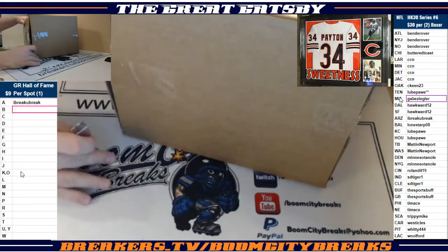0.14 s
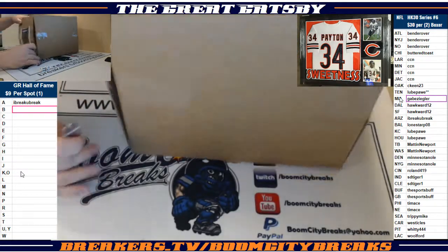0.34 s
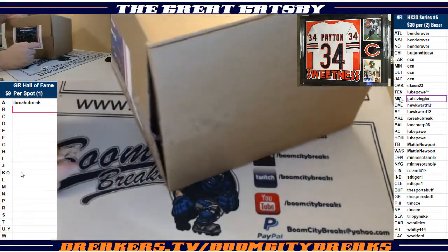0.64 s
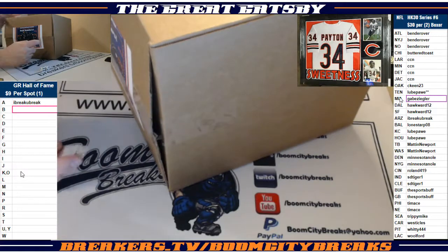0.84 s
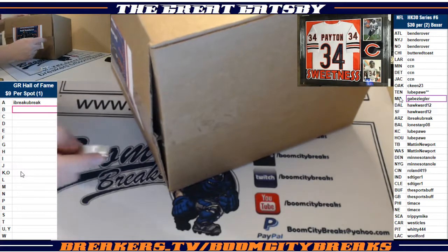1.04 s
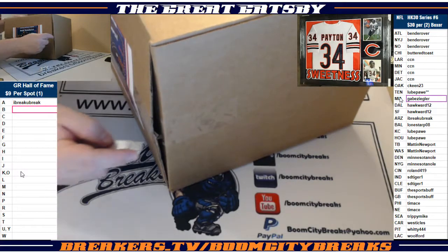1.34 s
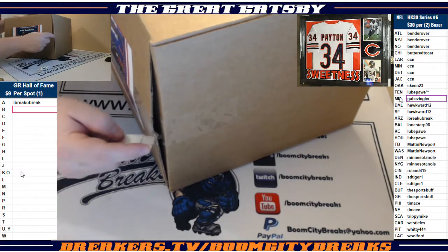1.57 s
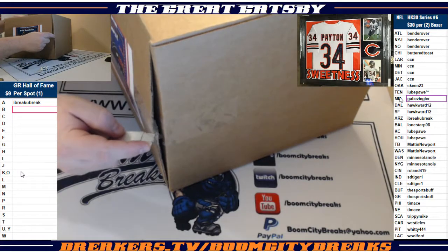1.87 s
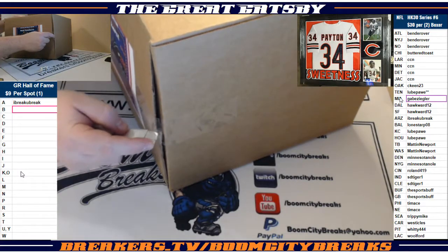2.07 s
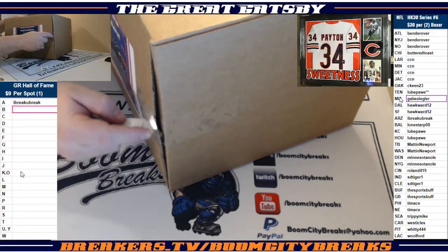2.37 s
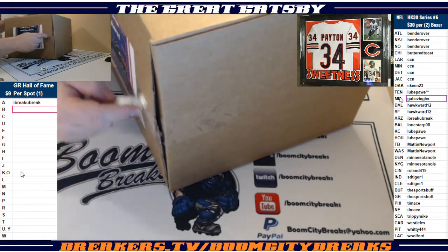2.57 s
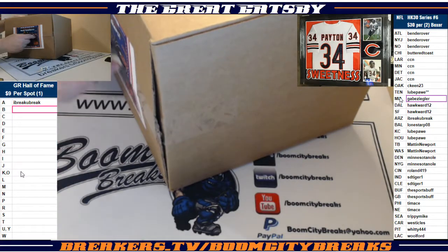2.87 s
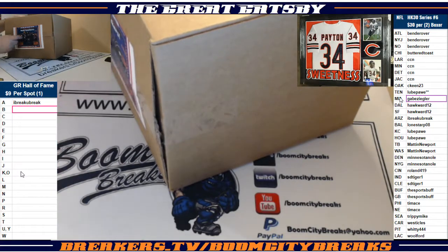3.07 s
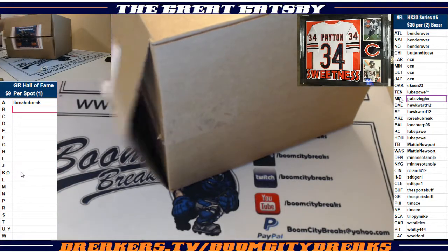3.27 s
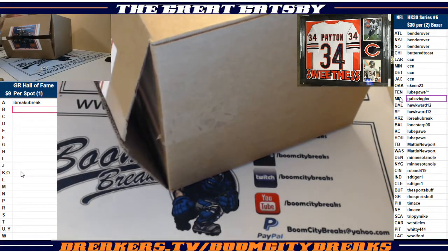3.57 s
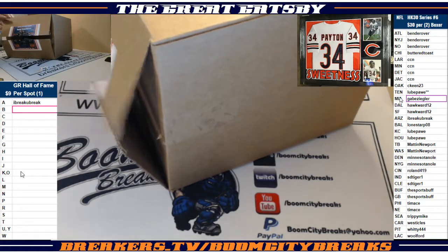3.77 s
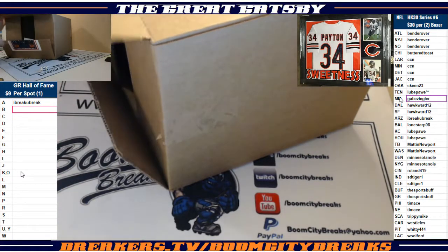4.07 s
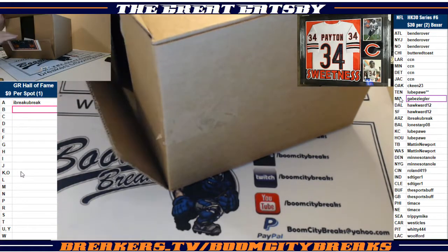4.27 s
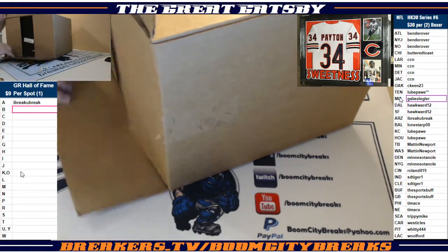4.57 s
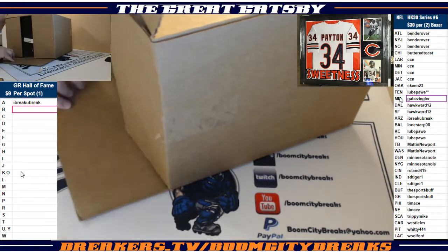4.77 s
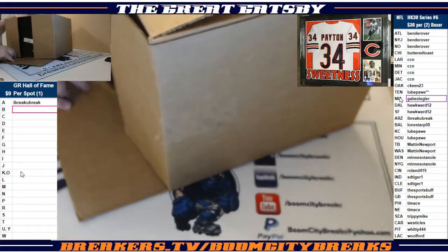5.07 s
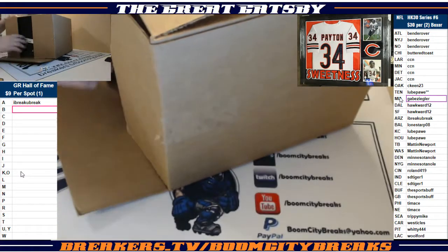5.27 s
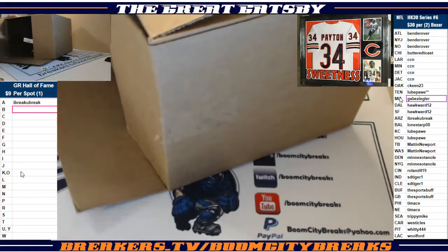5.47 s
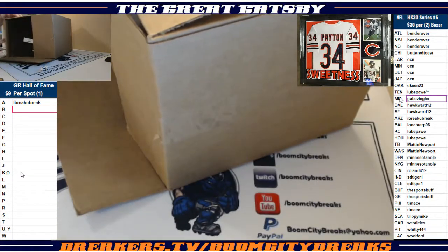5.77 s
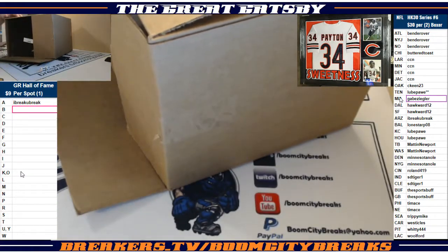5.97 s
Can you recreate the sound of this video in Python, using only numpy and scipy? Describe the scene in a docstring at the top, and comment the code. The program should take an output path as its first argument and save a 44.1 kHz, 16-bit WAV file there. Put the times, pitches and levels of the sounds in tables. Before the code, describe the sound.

In a small room, close to the microphone, a cardboard box knocks and slides round on a mat with rising hiss. After faint touches, a blade pops through tape and saws gritty along the seam, the tape ringing. Loud cracks snap the last tape, then flaps rub softly, one drags harshly, springs free with a hollow thump and glides to a stop. Faint fan noise and hum lie beneath.

```python
"""A cardboard box is handled on a desk mat in a small room, close to the microphone, over faint fan noise and hum.
It is knocked and swung round on the mat: friction noise whose hiss grows. After light touches a blade pops
through the tape and saws along the seam: gritty noise with a ringing tape. The last tape snaps in noise bursts.
Then the flaps are rubbed; one drags past the other, springs free and glides on, and a last soft touch follows.
Throughout, pushes ring the resonances of the hollow box, so that it drums."""
import sys
import numpy as np
from scipy import signal
from scipy.fft import rfft, irfft
from scipy.io import wavfile
from scipy.ndimage import uniform_filter1d

SR = 44100
rng = np.random.default_rng(int(sys.argv[2]) if len(sys.argv) > 2 else 0)


def unload_audio(sound):
    """Save the sound as a 16-bit wav file, at the path given as the first command line argument."""
    columns = np.transpose(np.atleast_2d(sound))
    # keep every value between -1 and 1, then stretch to whole-number steps
    steps = np.round(np.clip(columns, -1, 1) * 32767)
    wavfile.write(sys.argv[1], SR, steps.astype(np.int16))


N = 270333
TIME = np.arange(N) / SR  # s
HZ = np.fft.rfftfreq(8192, 1 / SR)  # frequencies at which filters are drawn

# parts of a friction sound: (lowest f/Hz, highest f/Hz)
PANEL, RASP, BOARD, HISS = (30, 820), (820, 3600), (100, 3400), (3600, SR)


def tape_cut():
    """The blade saws the seam: pressure steers rasp, panel drone and hiss, and the tape rings along."""
    # tone of the cut board: (f/Hz, level/dB)
    cut_colour = [(35, -48), (60, -17.5), (222, 0), (323, -12.5), (371, -12.5), (515, -10), (636, -7.5),
                  (785, -24), (1580, -15.5), (1910, -25), (2710, -15.5), (3420, -21.5), (7400, -23.5),
                  (12700, -31), (16000, -47)]
    # resonances of the cut board: (f/Hz, width/Hz, level/dB)
    cut_peaks = [(240, 97, 1), (391, 43, 14), (624, 280, 6.5), (1117, 160, 8.5), (1510, 170, 5.5),
                 (1646, 140, 9), (3070, 310, -1.5)]
    # ringing of the tape, sinking in pitch as it slackens: (t/s, f/Hz, strength as a factor)
    tape_ring = [(2.33, 8800, 0.92), (2.72, 8550, 2.2), (2.81, 7700, 2.46), (3.22, 7460, 0.51)]
    # pressure of the blade along the seam: (t/s, pressure as a level/dB)
    pressure_curve = [(2.33, -43), (2.352, -43), (2.362, -50), (2.522, -46.5), (2.542, -48.5), (2.64, -43),
                      (2.672, -49.5), (2.778, -36), (2.794, -40), (2.866, -45.5), (2.99, -35), (2.994, -39),
                      (3.132, -34.5), (3.218, -25), (3.222, -36.5)]
    usual_pressure_db = -40

    blade = friction(cut_colour, cut_peaks, grains_per_s=1300, spread_db=2.5, smooth=0.76, judder_db=0.24)
    ring_s, tape_hz, strength = np.transpose(tape_ring)
    ringing = resonate(blade, np.interp(TIME, ring_s, tape_hz), width=1000)
    blade = blade + np.interp(TIME, ring_s, strength) * ringing
    blade = blade * amp(0.9 * wander(rate=33))  # it catches on the flutes of the board

    s, pressure_db = np.transpose(pressure_curve)
    excess_db = np.interp(TIME, s, pressure_db) - usual_pressure_db
    contact = press(s[0] - .035, s[-1], attack_s=0.0042, swell_db_per_s=-0.5, release_db_per_s=380)
    travelled_s = np.clip(TIME, s[0], s[-1]) - s[0]

    def follow(start_db, growth, drift_db_per_s):
        """Gain of one part: growth is dB per dB of pressure; the drift adds to the easing of the contact."""
        return contact * amp(start_db + growth * excess_db + drift_db_per_s * travelled_s)

    rasp = follow(-41.5, 1.0, -0.45)
    drone = follow(-43.5, 0.62, 11)  # the loosened panel drones more and more
    hiss = follow(-44.5, 0.7, -0.63)
    return stroke(travel(blade, patchy_db=2), [rasp, drone, hiss], [RASP, PANEL, HISS])


def box_slide():
    """The box swings round on the mat: a nearly even rasp, and a hiss that grows with speed until it is braked."""
    # tone of the mat: (f/Hz, level/dB)
    slide_colour = [(100, -16), (300, -2.5), (800, -7), (1050, -2.5), (1350, -2.5), (2000, -0.5),
                    (3500, -1), (6500, 2.5), (9000, -1), (13000, -7), (16000, -17)]
    start, stop = .15, 0.6  # s
    mat = friction(slide_colour, [(1285, 120, 9), (1590, 110, 3.0)],  # f/Hz, width/Hz, level/dB
                   grains_per_s=9700, spread_db=1.5, smooth=1.8, judder_db=0.8)
    rasp = amp(-49) * press(start, stop, attack_s=.11, swell_db_per_s=2.5, release_db_per_s=106)
    hiss = amp(-49.5) * press(start, stop, attack_s=0.13, swell_db_per_s=16.5, release_db_per_s=174)
    return stroke(travel(mat, patchy_db=2.0), [rasp, hiss], [BOARD, HISS])


def light_rubs():
    """Fingers and flaps rub: separate strokes of rasp and hiss over two faint, longer rubs."""
    # tone of the rubbed board: (f/Hz, level/dB)
    rub_colour = [(100, -9), (400, 5.5), (800, -5), (1300, -1), (2000, -2), (2800, -1.5), (3400, -4),
                  (8500, -6), (12000, -13), (16000, -24.5)]
    # its resonances: (f/Hz, width/Hz, level/dB)
    rub_peaks = [(1050, 88, -2), (1310, 88, 7), (1670, 240, 0.5), (2650, 220, -19.5)]
    # separate rubs: (t/s at the firmest, rasp level/dB, rise time/s, hiss relative to the rasp/dB)
    rub_strokes = [(.979, -46, 0.014, -4), (2.164, -77.5, .003, 14.5), (3.254, -34.5, .002, -16),
                   (3.462, -45, 0.035, -7.5), (3.98, -42, 0.017, -8), (4.097, -51, 0.024, 2),
                   (4.205, -59, 0.056, 1), (4.347, -49, 0.035, -6), (4.587, -46.5, .08, -6.5),
                   (4.752, -52.5, 0.066, 0), (4.945, -57, .02, -1), (5.045, -50, 0.04, 0),
                   (5.19, -55.5, .015, -7), (5.262, -60, .01, -16.5), (5.337, -54, 0.01, -2.5),
                   (5.545, -44, 0.05, 1.5), (6.104, -52, 0.018, -14)]
    fall_s = .027  # every rub dies away alike

    fingers = friction(rub_colour, rub_peaks, grains_per_s=5300, spread_db=2.0, smooth=1, judder_db=2.6)
    # the hands stay on the flaps, rubbing unevenly
    hands = amp(-66.5 + 2 * wander(rate=12))
    hands = hands * press(4.4, 5.28, attack_s=.03, swell_db_per_s=-1.0, release_db_per_s=300)
    # a fainter rub holds steady below
    steady = amp(-73) * press(3.5, 5.6, attack_s=0.088, swell_db_per_s=0, release_db_per_s=301.5)
    rasp_power = hiss_power = hands ** 2 + steady ** 2
    for s, db, rise_s, hiss_db in rub_strokes:
        fade = np.maximum((s - TIME) / rise_s, (TIME - s) / fall_s)
        power = (amp(db) * np.exp(-fade)) ** 2
        rasp_power = rasp_power + power
        hiss_power = hiss_power + power * amp(hiss_db) ** 2
    gains = np.sqrt([rasp_power, hiss_power])
    return stroke(travel(fingers, patchy_db=2.5), gains, [BOARD, HISS])


def flap_drag():
    """One flap's edge rasps past the other; the panel drones more as it bends, until the flap springs free."""
    # tone of the dragged edge: (f/Hz, level/dB)
    drag_colour = [(35, -53), (60, -6), (156, -14), (202, 0.5), (330, -13), (398, -5), (767, -15.5),
                   (1010, -13), (1740, -17.5), (2350, -14.5), (2970, -16.5), (7570, -7.5), (16000, -15.5)]
    # its resonances: (f/Hz, width/Hz, level/dB)
    drag_peaks = [(203, 54, -10), (1010, 95, 5), (1440, 150, 11), (2510, 220, 10.5), (2640, 150, -5)]
    start, free = 5.374, 5.482  # s
    edge = friction(drag_colour, drag_peaks, grains_per_s=4000, spread_db=1.0, smooth=1, judder_db=1.5)
    rasp = amp(-33) * press(start, free, attack_s=0.0031, swell_db_per_s=6, release_db_per_s=220)
    drone = amp(-42) * press(start, free, attack_s=0.0088, swell_db_per_s=101, release_db_per_s=175)
    # the hiss comes in more slowly, with speed
    hiss = amp(-26.5) * press(start, free, attack_s=0.034, swell_db_per_s=4, release_db_per_s=750)
    return stroke(travel(edge, patchy_db=2.5), [rasp, drone, hiss], [RASP, PANEL, HISS])


def flap_glide():
    """The freed flap glides on and slows, its hiss fading a little faster than its rasp."""
    # tone of the gliding flap: (f/Hz, level/dB)
    glide_colour = [(200, -9), (550, -0.5), (850, -7.5), (1400, -8.5), (1900, -11.5), (2600, 0),
                    (3800, -8.5), (8500, -9.5), (11000, -6), (16000, -20)]
    # its resonances: (f/Hz, width/Hz, level/dB)
    glide_peaks = [(590, 45, -4), (1300, 62, 5), (1487, 88, 17), (2166, 110, 9), (2500, 57, 6),
                   (4785, 390, 3)]
    start, stop = 5.585, 5.86  # s
    flap = friction(glide_colour, glide_peaks, grains_per_s=9700, spread_db=6, smooth=2.3, judder_db=2.0)
    rasp = amp(-39) * press(start, stop, attack_s=0.089, swell_db_per_s=-39.5, release_db_per_s=206.5)
    hiss = amp(-45.5) * press(start, stop, attack_s=0.045, swell_db_per_s=-41.5, release_db_per_s=210)
    return stroke(travel(flap, patchy_db=3.5), [rasp, hiss], [BOARD, HISS])


def cracks():
    """Tape and board crack, and every crack jolts the hollow box."""
    # cracks: (t/s, relative level/dB, decay/s, treble tilt/dB per octave)
    crack_list = [(0.105, -38, 0.0073, -2.5), (.898, -52.5, 0.012, 3.5), (1.62, -71, .008, 2),
                  (1.31, -71.5, .027, -1.5), (1.808, -59.5, 0.013, 0.5), (2.266, -34.5, 0.03, -12.5),
                  (2.3092, -33, 0.006, 11), (2.343, -32, 0.0045, 7), (2.567, -40, .0044, 0),
                  (3.251, -21.5, 0.0039, 8), (3.428, -48, 0.033, -5), (3.794, -9.5, 0.0058, -1),
                  (3.806, -4.5, 0.0075, -0.1), (3.815, -5.5, 0.0074, 3.5), (3.826, -11.5, .003, 4),
                  (3.839, -19.5, 0.0081, 1), (3.9, -7, 0.0049, 0.7), (3.9409, -17.5, 0.0048, 1.5),
                  (3.965, -31, 0.012, -3), (4.2964, -46, 0.0037, -4.5), (4.794, -50.5, .009, -0.5),
                  (5.38, -34, 0.0043, -17)]
    out = np.zeros(N)
    for s, db, decay, tilt_db in crack_list:
        add(out, s, snap(db, decay, tilt_db))
        add(out, s, knock(db - 13, centre_hz=290, crunch_s=0.005))
    return out


def blows():
    """Each blow ticks on contact and drums the box, which then settles once more, softer and lower."""
    # blows: (t/s, peak level/dB, centre of the push f/Hz, crunch time/s, relative tick level/dB)
    blow_list = [(0.0904, -28, 240, 0.0074, -33), (.319, -32.5, 268, 0.02, -56),
                 (.656, -27.5, 720, 0.011, -47), (.973, -34.5, 173, 0.007, -45.5),
                 (.977, -40, 516, 0.013, -57), (1.698, -42.5, 580, 0.0092, -51),
                 (1.742, -47, 547, 0.008, -47.5), (2.1567, -34.5, 374, .0052, -67),
                 (2.216, -41.5, 460, 0.0038, -72), (2.256, -46, 520, .0046, -75),
                 (2.2766, -17, 980, 0.0068, -26), (2.282, -12.5, 378, 0.0062, -54),
                 (2.611, -28.5, 270, 0.011, -41), (2.972, -22.5, 250, 0.0075, -60),
                 (3.218, -17, 370, 0.0097, -39), (3.2524, -16, 495, 0.0053, -42),
                 (3.942, -21.5, 354, 0.0075, -45), (3.974, -26.5, 284, 0.018, -36),
                 (4.073, -31, 352, 0.012, -46.5), (4.149, -41.5, 328, 0.0026, -53),
                 (4.7032, -41.5, 210, .0065, -44), (5.007, -27, 239, 0.0051, -50.5),
                 (5.009, -33, 590, 0.0076, -54), (5.046, -44, 556, .006, -49.5),
                 (5.316, -37.5, 330, 0.019, -62), (5.335, -34, 79, 0.005, -65),
                 (5.424, -29.5, 210, 0.013, -44), (5.488, -11.5, 547, 0.0065, -49),
                 (5.496, -15, 207, 0.012, -52), (5.509, -20, 151, 0.013, -55),
                 (5.597, -33, 580, 0.0062, -59), (6.1, -42.5, 253, 0.011, -70)]
    out = np.zeros(N)
    for s, db, hz, crunch_s, tick_db in blow_list:
        add(out, s, snap(tick_db, decay=0.0065, tilt_db=2))
        add(out, s, knock(db, hz, crunch_s))
        add(out, s + .014, knock(db - 8, hz * 0.82, crunch_s))
    return out


def crackle():
    """Stray fibres crack at random moments, each up to 3 dB above or below the typical level."""
    # stretches of crackling: (from t/s, to t/s, cracks per s, typical relative level/dB)
    crackle_spans = [(2.346, 3.202, 26, -43), (4.001, 5.3, 11, -59)]
    out = np.zeros(N)
    for start, stop, per_s, db in crackle_spans:
        for _ in range(round(per_s * (stop - start))):
            s = rng.uniform(start, stop)
            add(out, s, snap(db + rng.uniform(-3, 3), decay=0.0013, tilt_db=-5.5))
    return out


def scuffs():
    """Board and tape scuff and squeak briefly, each at its own pitch."""
    # scuffs: (t/s, level before the swell/dB, length/s, middle pitch f/Hz)
    scuff_list = [(0.086, -37, 0.024, 4240), (0.103, -38.5, 0.011, 1670), (1.742, -60, 0.016, 2440),
                  (3.185, -34, .045, 1480), (3.248, -25, .017, 1390), (3.445, -43, 0.048, 1405),
                  (3.898, -22, 0.013, 2670), (4.321, -54.5, 0.049, 1080), (4.325, -51.5, 0.043, 2670),
                  (4.365, -61.5, 0.35, 2760), (4.532, -49.5, 0.054, 880), (4.657, -49.5, 0.046, 1345),
                  (4.786, -49, 0.029, 2790), (5.417, -33, 0.024, 1015), (5.59, -52.5, 0.22, 580),
                  (5.605, -45, 0.088, 1270), (5.656, -46, .088, 1480), (5.827, -48, 0.073, 1086)]
    out = np.zeros(N)
    for s, db, length, pitch_hz in scuff_list:
        add(out, s, scuff(db, length, pitch_hz))
    return out


def scuff(db, length, pitch_hz):
    """A short rub sings in one resonance of the board, which sinks as the edge slows."""
    swell = signal.windows.tukey(round(length * SR), .7)
    hz = pitch_hz * (1 + 0.07 * np.linspace(.5, -.5, len(swell)))  # loses 7 % of the pitch
    song = resonate(rng.standard_normal(len(swell)), hz, width=120)
    song = resonate(song, hz, width=400)
    return amp(db) * swell * evened(song)


def snap(db, decay, tilt_db):
    """A run of fibres breaks within milliseconds: a noise burst rings the taut tape."""
    # tone of a crack before its tilt: (f/Hz, level/dB)
    crack_colour = [(60, -25.5), (200, -11.5), (450, -5.5), (650, -5), (1200, -8), (2000, -5.5), (2800, -2),
                    (3400, -4.5), (4900, -2), (7500, -6.5), (10500, -17), (14000, -23.5), (16000, -27)]
    # resonances of the tape: (f/Hz, width/Hz, level/dB)
    tape_modes = [(1240, 130, 6.5), (1480, 380, 5.5), (2716, 80, 7), (2960, 60, 2.5), (3806, 260, 3),
                  (4240, 110, 3.5), (4520, 74, 4.5), (4864, 220, 5), (6570, 120, 0.5), (7400, 180, 1)]
    t = np.arange(SR // 8) / SR
    burst = rng.standard_normal(len(t)) * np.exp(-t / decay) * (1 - np.exp(-t / 0.00087))
    # the tilt turns about 4 kHz and stays flat below 500 Hz
    colour = [(hz, level + tilt_db * np.log2(max(hz, 500) / 4000)) for hz, level in crack_colour]
    return amp(db + 2.0) * signal.fftconvolve(burst, response(colour, tape_modes))


def knock(db, centre_hz, crunch_s):
    """A push rings the box modes near its own pitch; the board crunches while it gives."""
    # tone of a push: (multiple of its centre frequency, level/dB)
    push_shape = [(.2, -20), (.65, -1.5), (1, 2), (1.5, -5.5), (3, -20.5), (8, -47), (50, -82)]
    # resonances of the panels and the air in the box: (f/Hz, width/Hz, level/dB)
    box_modes = [(72.2, 22, 6.5), (123, 17, 14), (213.8, 5.1, 10), (269.7, 36, 10), (389, 4.4, 11.5),
                 (453.4, 25, 12.5), (612.6, 15, 11), (805, 82, -1), (1110, 27, 9), (1440, 55, 11.5)]
    t = np.arange(SR // 12) / SR
    force = 0.051 * rng.standard_normal(len(t)) * np.exp(-t / crunch_s)
    force[0] = 1  # the push itself
    colour = [(centre_hz * multiple, level) for multiple, level in push_shape]
    sound = signal.fftconvolve(force, response(colour, box_modes))
    return amp(db) * sound / abs(sound).max()


def friction(colour, peaks, grains_per_s, spread_db, smooth, judder_db):
    """Fibres catch and let go: clicks of uneven size over a smooth hiss, ringing the board."""
    sizes = amp(spread_db * np.minimum(rng.exponential(1, N), 4))
    clicks = sizes * rng.choice([-1, 1], N) * (rng.random(N) < grains_per_s / SR)
    drive = evened(clicks) + smooth * rng.standard_normal(N)
    drive = drive * amp(judder_db * wander(rate=85))
    return signal.oaconvolve(drive, response(colour, peaks))[:N]


def travel(x, patchy_db):
    """As the contact moves over the board, narrow resonances come and go."""
    z = signal.stft(x, nperseg=1024)[2]
    patches = rng.standard_normal(z.shape)
    for _ in range(2):  # smoothed over neighbouring pitches and moments
        patches = uniform_filter1d(patches, size=4, axis=0)
        patches = uniform_filter1d(patches, size=7, axis=1)
    return signal.istft(z * amp(patchy_db * evened(patches)), nperseg=1024)[1][:N]


def stroke(sound, gains, bands):
    """Plays each band of a friction sound on its own gain."""
    hz = np.fft.rfftfreq(N, 1 / SR) + 1
    spectrum = rfft(sound)
    out = np.zeros(N)
    for gain, (lo, hi) in zip(gains, bands):
        band = 1 / (1 + (lo / hz) ** 8) / (1 + (hz / hi) ** 8)
        out += evened(irfft(spectrum * band, N)) * gain
    return out


def press(start, stop, attack_s, swell_db_per_s, release_db_per_s):
    """Gain of one stroke: it takes hold, swells or eases while it lasts, and dies away."""
    attack = np.clip((TIME - start) / attack_s, 0, 1)
    held_s = np.clip(TIME, start, stop) - start
    released_s = np.maximum(TIME - stop, 0)
    return attack * amp(swell_db_per_s * held_s - release_db_per_s * released_s)


def room(x, early_db, tail_db):
    """A few reflections from the desk and walls, and a short diffuse tail."""
    # how long the tail takes to fall by 60 dB: (f/Hz, time/s)
    tail_times = [(100, 0.37), (400, 0.34), (1500, 0.34), (5000, 0.34), (10000, 0.32), (16000, 0.1)]
    t = np.arange(SR * 2 // 3) / SR
    taps = rng.choice([-1., 1.], len(t)) * (rng.random(len(t)) < .1)  # sparse random echoes
    taps = taps * (1 - np.exp(-t / 0.0084))
    hz, at, z = signal.stft(taps, SR, nperseg=256)
    fade = amp(-60 * at / read(tail_times, hz)[:, None])
    tail = signal.istft(z * fade, SR, nperseg=256)[1]
    echo = amp(tail_db) * tail / np.linalg.norm(tail)
    for k, s in enumerate([.0047, .0071, .0103, .0139]):
        echo[round(s * SR)] += amp(early_db) * (-1) ** k
    return signal.fftconvolve(x, echo)[:N]


def background():
    """Low fan noise, coloured and slowly wavering, with mains hum as a steady sine."""
    # tone of the fan noise: (f/Hz, level/dB)
    air_colour = [(20, -31.5), (50, -15.5), (90, -16.5), (125, -12), (165, -22.5), (262, -5.5),
                  (310, -15.5), (400, -12), (574, -20), (800, -28), (1000, -27.5), (2200, -36.5),
                  (6000, -46), (16000, -58.5)]
    # hum: (f/Hz, level/dB)
    hum_tones = [(119.7, -65.5)]
    air = evened(signal.oaconvolve(rng.standard_normal(N), response(air_colour))[:N])
    air = air * amp(.6 * wander(rate=4.6))
    hum = sum(amp(db) * np.sqrt(2) * np.sin(2 * np.pi * hz * TIME) for hz, db in hum_tones)
    return amp(-61) * air + hum


def amp(db):
    """Turns decibels into a gain."""
    return 10 ** (np.asarray(db) / 20)


def evened(x):
    """Scales to an rms (average strength) of one."""
    return x / np.sqrt(np.mean(x ** 2) + 1e-20)


def read(points, hz):
    """Reads a curve between its points, on a log-frequency axis."""
    f, value = np.transpose(points)
    return np.interp(np.log(hz + 1), np.log(f + 1), value)


def add(mix, s, sound):
    """Mixes a sound in at time s."""
    part = mix[round(s * SR):][:len(sound)]
    part += sound[:len(part)]


def wander(rate):
    """Slow random drift of unit size, with no movement faster than the rate in Hz."""
    spectrum = rfft(rng.standard_normal(N))
    return evened(irfft(spectrum * (np.fft.rfftfreq(N, 1 / SR) < rate), N))


def response(colour, peaks=()):
    """Filter of unit energy that never sounds ahead of its input: a broad colour with resonances on it."""
    power = 1 + sum(amp(db) ** 2 / (1 + (2 * (HZ - hz) / width) ** 2) for hz, width, db in peaks)
    log_gain = np.log(amp(read(colour, HZ)) * np.sqrt(power))
    circle = np.concatenate([log_gain, log_gain[-2:0:-1]])
    # the Hilbert transform gives the phase that makes the filter respond soonest
    taps = np.fft.ifft(np.exp(np.conj(signal.hilbert(circle)))).real[:len(HZ)]
    return taps / np.linalg.norm(taps)


def resonate(x, hz, width):
    """A resonance that follows the curve hz: shift it to 0 Hz, smooth, and shift back."""
    turn = np.exp(2j * np.pi * np.cumsum(hz) / SR)
    r = np.exp(-np.pi * width / SR)
    return 2 * (turn * signal.lfilter([1 - r], [1, -r], x / turn)).real


def scene():
    """All handling sounds in the room, over its background."""
    rubbing = tape_cut() + box_slide() + light_rubs() + flap_drag() + flap_glide()
    box = rubbing + cracks() + blows() + crackle() + scuffs()
    return (box + room(box, early_db=-23.5, tail_db=-14.5) + background())[None]


def record(dry):
    """The microphone rounds off the loudest peaks softly; then the treble ends near 16 kHz."""
    ceiling = .66
    driven = ceiling * np.tanh(dry / ceiling)
    lowpass = signal.firwin(511, 16100, window=("kaiser", 9), fs=SR)
    return signal.oaconvolve(driven, lowpass[None], "same")


dry = scene()
out = record(dry)
unload_audio(out)
```